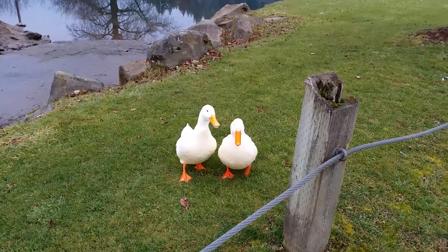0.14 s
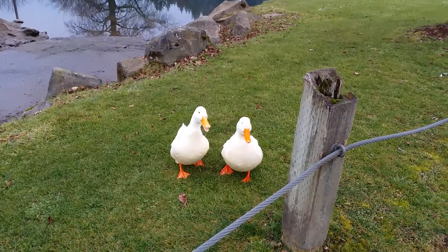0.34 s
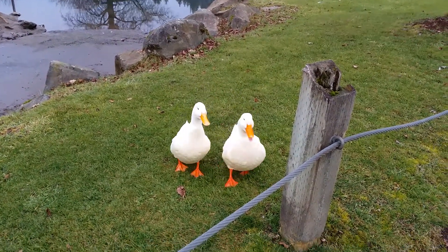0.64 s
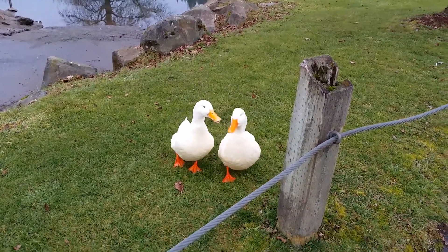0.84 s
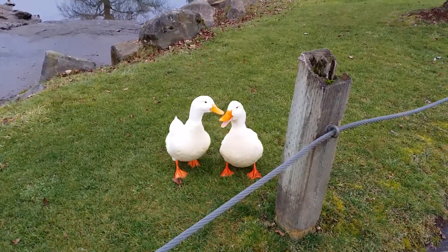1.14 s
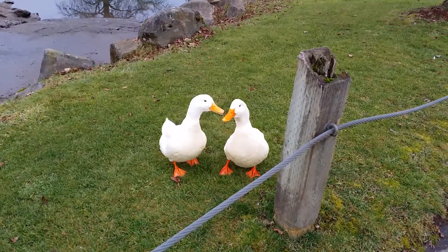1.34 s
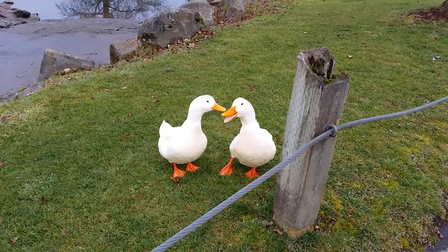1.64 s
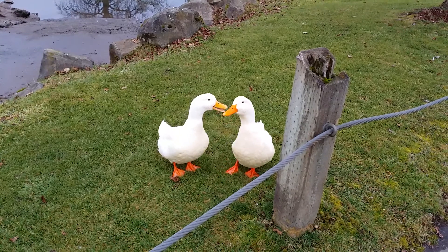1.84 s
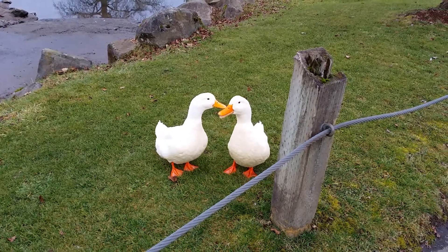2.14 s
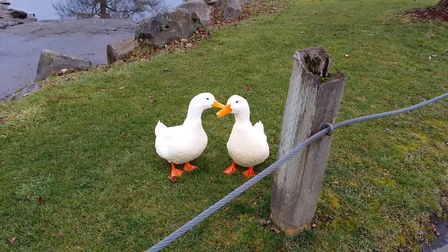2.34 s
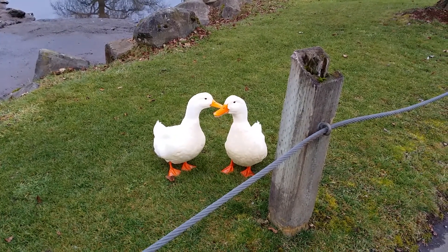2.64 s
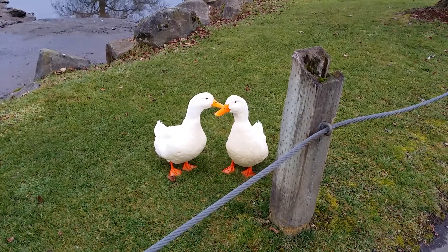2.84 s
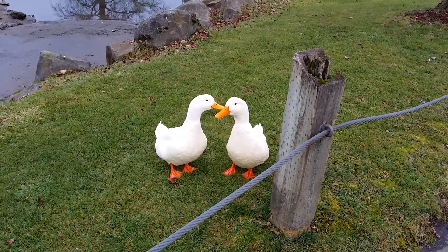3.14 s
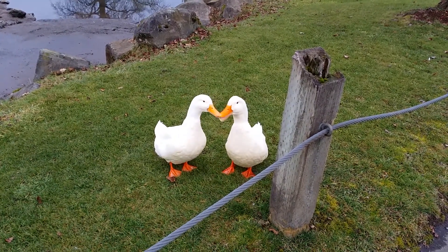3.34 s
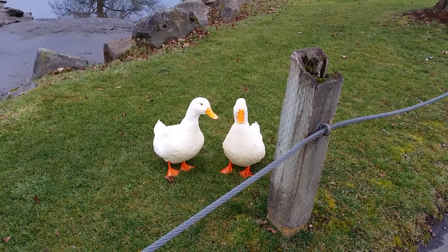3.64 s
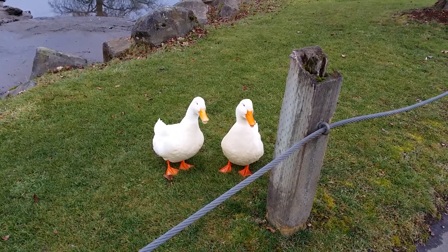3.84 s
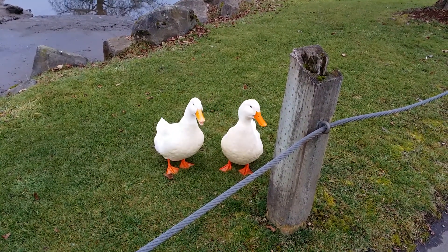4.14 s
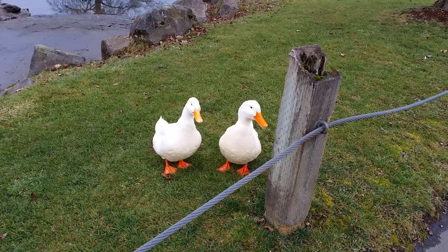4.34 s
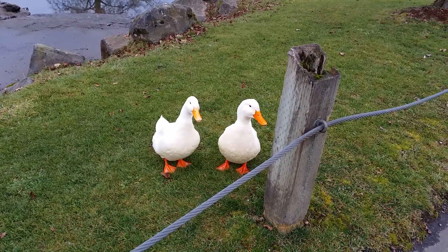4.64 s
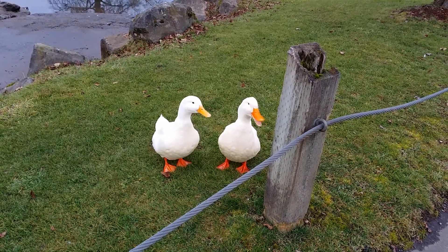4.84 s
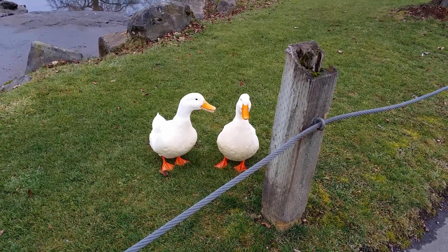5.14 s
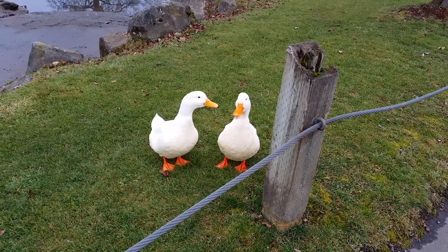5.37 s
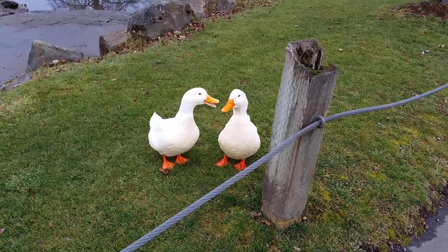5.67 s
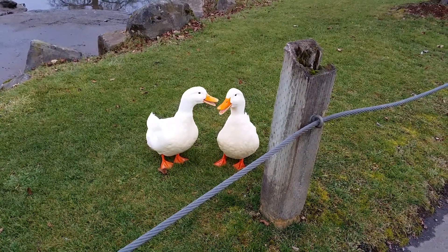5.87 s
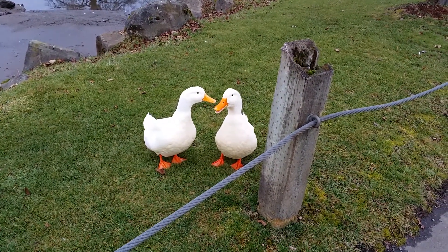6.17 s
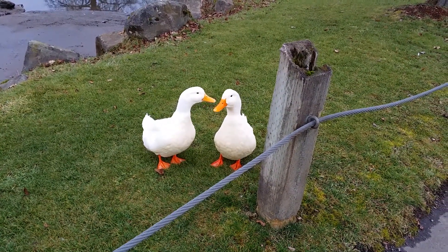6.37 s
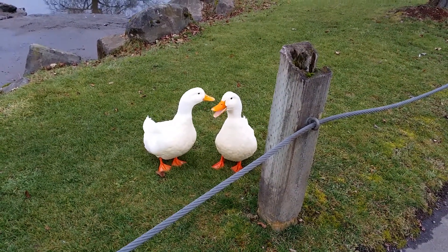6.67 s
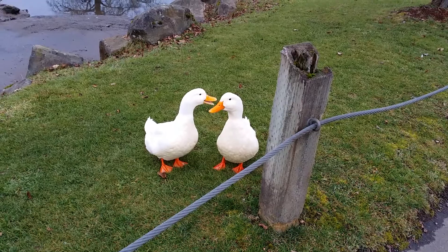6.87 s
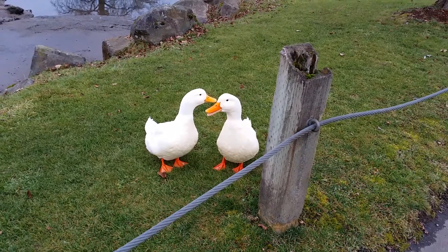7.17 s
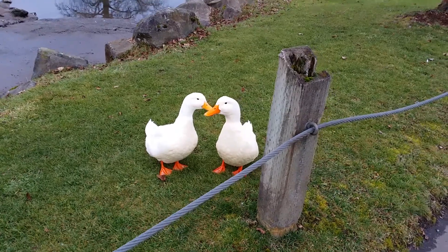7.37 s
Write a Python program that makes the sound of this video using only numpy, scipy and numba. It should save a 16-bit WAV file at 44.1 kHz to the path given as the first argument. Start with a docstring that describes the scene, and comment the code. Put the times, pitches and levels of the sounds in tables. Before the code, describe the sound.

Quick duck conversation outdoors: low-pitched, pulsing quacks, raspier and brighter early on, then alternating between weak mutters and stronger accents, with small clicks of the bills. A thin small bird whistles early, mostly to the right. Distant engines drone quietly under airy background noise. One low thump knocks the left side near two seconds. Hand-held two-microphone phone at close to medium distance, open lawn, little reverberation.

```python
"""On a lakeside lawn, two white ducks chatter a few metres from a hand-held phone with two microphones.
Each quack is a short rattle of syrinx pulses ringing the windpipe, raspy when pushed; bill clicks fall
mostly at the starts of the quacks. Small birds whistle thinly as gliding sine tones; distant engines hum
in a few wavering partials. Open air is noise in flickering bands, and pressure steps bump the left microphone."""
import sys
import numpy as np
from scipy import signal
from scipy.fft import rfft, irfft
from scipy.io import wavfile
from scipy.ndimage import uniform_filter1d
from numba import njit

SR = 44100
rng = np.random.default_rng(int(sys.argv[2]) if len(sys.argv) > 2 else 0)


def store_wav(level_fs):
    """Save 16-bit WAV to argv[1]."""
    pcm = np.round(np.clip(np.atleast_2d(level_fs), -1, 1) * 32767)
    wavfile.write(sys.argv[1], SR, pcm.T.astype(np.int16))


N = 331174
TIME = np.arange(N) / SR

# quacks, before the path to the microphones; rate is at the strongest pulse, resonances are nominal
# [peak_s, attack_s, release_s, level_db, rasp_db, rate_hz, pipe_hz, mouth_hz]
QUACKS = [(0.0712, 0.044, 0.071, -29.5, -14.5, 78, 1917, 1960),
          (0.2395, 0.072, 0.079, -26.5, -14.5, 89, 1866, 2010),
          (0.4144, 0.059, 0.068, -28, -11.5, 87, 1967, 2120), (0.637, 0.1, 0.12, -29, -19, 86, 1810, 1896),
          (0.7517, 0.037, 0.059, -31, -11, 85, 1955, 2030),
          (0.9504, 0.055, 0.071, -25, -13.5, 79.6, 1864, 2007),
          (1.137, 0.068, 0.077, -27, -13.5, 86, 1835, 2020),
          (1.2727, 0.066, 0.043, -33.5, -19, 71, 1940, 1940),
          (1.475, 0.053, 0.065, -26, -17.5, 98, 1882, 1960),
          (1.656, 0.069, 0.085, -28.5, -19, 81.4, 1792, 1934),
          (1.86, 0.038, 0.071, -37.5, -21, 70, 1940, 1825),
          (2.0754, 0.13, 0.081, -31.5, -22, 81, 1764, 1840),
          (2.4144, 0.05, 0.071, -33, -22, 77, 1815, 1730),
          (2.581, 0.053, 0.084, -29, -21, 85, 1795, 1880.0),
          (2.7644, 0.053, 0.049, -40.5, -19.5, 75, 1934, 1680),
          (3.036, 0.13, 0.084, -34.5, -25.5, 76, 1754, 1776),
          (3.3889, 0.097, 0.074, -35, -17.5, 70, 1800, 1740),
          (3.5475, 0.069, 0.077, -27, -16.5, 93, 1880, 1915),
          (3.9614, 0.11, 0.14, -32.5, -18, 81.5, 1755, 1832),
          (4.195, 0.058, 0.047, -31.5, -12, 75, 1917, 1975),
          (4.3587, 0.05, 0.055, -32.5, -19, 77, 1800, 1855),
          (4.52, 0.055, 0.082, -28.5, -17, 91.6, 1816, 1970),
          (4.576, 0.035, 0.045, -36.5, -10.5, 71, 1933, 2010),
          (4.7664, 0.048, 0.058, -31.5, -11, 78, 1916, 1990),
          (4.8836, 0.048, 0.078, -30.5, -20, 76, 1800, 1815),
          (5.0536, 0.072, 0.08, -27, -15.5, 83.8, 1794, 1957),
          (5.1551, 0.043, 0.052, -35, -20.5, 73, 1934, 1910),
          (5.3911, 0.069, 0.096, -30.5, -18, 86, 1783, 1813),
          (5.5715, 0.067, 0.075, -26, -18.5, 86, 1780, 1960),
          (5.73, 0.069, 0.044, -37, -20, 69, 1960, 1820), (5.9725, 0.1, 0.12, -31, -21.5, 90, 1770, 1776),
          (6.1551, 0.06, 0.065, -28, -18, 80, 1798, 1936),
          (6.3125, 0.051, 0.07, -40.5, -18.5, 68, 1940, 1540.0),
          (6.5456, 0.073, 0.12, -32, -21, 81, 1780, 1670),
          (6.7265, 0.065, 0.071, -27.5, -20, 85, 1794, 1887),
          (6.9304, 0.048, 0.077, -42, -19, 71, 1863, 1600),
          (7.1463, 0.1, 0.138, -32.5, -23, 79.5, 1760, 1710),
          (7.306, 0.06, 0.08, -27.5, -21, 88, 1770, 1930)]
# short quacks come to a point, drawn-out ones hold their level [attack_s, rise_flatness (exponent)]
RISE_FLATNESS = [(.06, 2.28), (.11, 3.9)]
FALL_FLATNESS = 1.89
# nominal resonances of the long windpipe [pipe_multiple (ratio), width_hz, level_db]
THROAT = [(0.682, 126, 7.5), (0.788, 151, 4), (0.998, 108, 4), (1.1, 83, -8.5), (1.2, 107, 3.5),
          (1.33, 170, -4.5)]
# nominal resonances of the bill and mouth [pitch_hz, width_hz, level_db]
BILL = [(3170, 380, 0.5), (3440, 57, 6), (3754, 100, 7), (4184, 150, 6), (4550, 110, 3), (4964, 180, 8),
        (5300, 78, 0.5), (5890, 150, -2.5), (6810, 210, 0), (7400, 480, -10)]
USUAL_PIPE_HZ = 1880  # windpipe resonance around which the bill resonances shift
# bill clicks; treble is relative to the body of the click [start_s, peak_db, treble_db]
CLICKS = [(0.0254, -23.5, -32), (.159, -28.5, -19), (.5414, -29, -13), (.714, -24, -22), (0.904, -27.5, -9),
          (1.221, -31.5, -36), (1.4323, -31, -18), (1.822, -32.5, -38), (1.951, -31, -12),
          (2.323, -43, -16), (2.368, -35.5, -8), (2.718, -34.5, -33), (2.916, -39, -10),
          (3.295, -32.5, -21), (3.34, -31.5, -11.5), (3.858, -34, -12), (3.877, -27, -41),
          (4.3123, -29, -26), (4.533, -24.5, -16), (4.838, -31, -29), (5.117, -30.5, -24), (5.345, -28, -7),
          (5.678, -33, -30), (5.882, -32.5, -12), (6.278, -33, -32), (6.485, -33, -10), (6.892, -38.5, -25),
          (7.057, -34.5, -8.5), (7.493, -29, -31)]
CLICK_PAN_DB = -7.5  # left minus right
# colour of the path from the ducks to each microphone, with the dips of the ground bounce
# [pitch_hz, level_db]
LEFT_PATH = [(500, -6), (1000, -0.5), (1200, 6), (1450, 7), (1620, -9.5), (1900, 1.5), (2300, -10.5),
             (2700, -3.5), (3400, 6), (4400, -2), (5000, 4.5), (6500, 8.5), (9000, -13)]
RIGHT_PATH = [(500, -7.5), (1000, -15.5), (1200, 6), (1450, 4.5), (1610, 4), (1740, 7), (2200, 4.5),
              (2700, 5), (3400, 9), (4900, 10.5), (6400, 4.5), (7200, -5), (9000, -11)]
# bird whistles, before each side's gain; turn is the share of the length before the middle pitch
# [start_s, end_s, turn (share), first_hz, middle_hz, last_hz, level_db]
WHISTLES = [(.46, .76, .55, 7200, 7850, 7750, -65), (.57, .72, .5, 8100, 8250, 8050, -65),
            (1.24, 1.58, .5, 7300, 8080, 7400, -66), (3.39, 3.45, .5, 7050, 7080, 7000, -58),
            (6.7, 6.88, .5, 6600, 7500, 8400, -70), (7.435, 7.475, .5, 5300, 6000, 6500, -63)]
# a nearer whistle, before its sag, fade and each side's gain [start_s, first_hz, top_hz, level_db]
LONE_WHISTLE = (.768, 2800, 3380, -52)
# a far engine whose pitch wanders and ends lower [time_s, pitch_hz, level_db]
ENGINE = [(0, 173.9, -51.5), (1.0, 174.6, -47), (2.3, 179, -43.5), (3.7, 169.6, -47.5), (4.4, 166, -42.5),
          (6.15, 167.7, -38.5), (6.4, 157.8, -57.5), (7.5, 149.4, -48.5)]
# deeper drones that come and go [start_s, end_s, pitch_at_start_hz, level_db]
DRONES = [(0, 2.1, 71.2, -40), (5.6, 6, 76.66, -47)]
# higher whines that come and go [start_s, end_s, pitch_at_start_hz, level_db]
WHINES = [(2.25, 2.8, 346, -54.5), (2.75, 3.5, 361, -54.5), (4.3, 4.85, 350, -59)]
DRONE_SAG_HZ_PER_S, WHINE_SAG_HZ_PER_S, HUM_FADE_DB_PER_S = 1.5, 7.3, 43
# spectrum of the outdoor background, relative [pitch_hz, level_db (per Hz)]
AIR = [(18, -43), (30, 2.5), (119, 1.5), (195, -3.5), (524, -15), (735, -12.5), (1200, -20), (1340, -23.5),
       (1690, -23), (2490, -25.5), (3680, -35), (6040, -39.5), (8250, -39), (13900, -52), (15000, -52)]
AIR_DB = -40.5
# background at the two microphones [pitch_hz, likeness (0 to 1), left_minus_right_db]
AIR_STEREO = [(60, 0.98, -3), (298, 0.91, -5), (740, 0.12, -4.5), (1540, 0, -13.5), (5000, 0.0072, -2),
              (12000, 0.0015, 3)]
# level of the low traffic rumble over time [time_s, level_db]
RUMBLE = [(0, -1), (2.8, 1.5), (3.7, -1.5), (4.7, 0.5), (6.1, -1), (7.4, -1.5)]
RUMBLE_TOP_HZ = 250
# knocks on the left microphone [start_s, pressure_step (relative)]
BUMPS = [(1.6, 0.029), (1.9684, 0.28), (1.9704, 1.38)]
TOP_HZ = 14750  # upper limit of the phone


def ducks(level_db=-2.5):
    """All quacks; each microphone hears them with its own colour, the right a tiny lag later."""
    out = np.zeros(N)
    lag = 4  # samples
    for row in QUACKS:
        add(out, *quack(*row))
    return undb(level_db) * np.array([colour(out, LEFT_PATH), colour(np.roll(out, lag), RIGHT_PATH)])


def quack(peak, attack, release, db, rasp_db, rate, pipe_hz, mouth_hz, slowing=.2, fall_db=21,
          rasp_fall_db=31, lead_s=0.000499, overtone=0.44, hiss_db=-17, onset_droop=0.53, gape=0.067):
    """One quack: effort swells and falls, and with it pulse rate, brightness and rasp."""
    jitter, scatter_db, ragged_db = .016, 1.5, .8  # jitter in cycles
    burst_s, sweep_per_s = .0022, 60
    skirt, skirt_s, rasp_s, evenness = .3, .0048, .0027, .8
    sinking, pipe_sinking, pipe_wobble, mouth_wobble = .36, .07, .009, .045

    # weak quacks and very raspy ones are breathier, and the syrinx leaks between the pulses
    weak_breath = np.interp(db, [-38, -29], [.6, .3])
    raspy_breath = np.interp(rasp_db, [-14, -10], [.3, .55])
    breath = max(weak_breath, raspy_breath)
    leak = .5 * breath

    start, end = peak - attack, peak + release
    t = np.arange(max(start - .02, 0), end + .03, 1 / SR)
    rise_flatness = np.interp(attack, *np.transpose(RISE_FLATNESS))
    flat = np.where(t < peak, rise_flatness, FALL_FLATNESS)
    away = effort_gap(t, start, peak, end)
    slack = np.minimum(away, 1) ** 2

    # the syrinx opens once a cycle, slower and less evenly at both ends of the call
    cycles = np.cumsum(rate * (1 - slowing * slack)) / SR
    cycles -= np.interp(peak - lead_s, t, cycles)
    nearest = np.round(cycles)
    count = (nearest - nearest[0]).astype(int)
    # five random draws, each held for one pulse
    chance = rng.standard_normal((count[-1] + 1, 5))[count].T
    timing, strength, length, mouth_chance, pipe_chance = chance
    since = (cycles - nearest + jitter * timing) / rate  # seconds from the opening
    uneven_db = (scatter_db + ragged_db * slack) * strength
    cut_in_db = 40 * np.maximum(away - .8, 0) * (t < peak)  # the call starts abruptly
    swell = undb(-fall_db * away ** flat - cut_in_db + uneven_db)

    # the vowel arches: it rises as the bill opens, holds, and drops late in the tail
    droop = np.minimum(away, 1) ** 2.6 * np.where(t < peak, onset_droop, 1)
    centre = mouth_hz * (1 + gape - sinking * droop) * (1 + mouth_wobble * mouth_chance)
    bend = 1 + pipe_sinking * (.2 - np.sqrt(droop)) + pipe_wobble * pipe_chance

    # each opening is a sharp snap on a wider skirt, while the membrane sweeps up
    # through the windpipe resonances
    phase = 2 * np.pi * centre * (since + sweep_per_s * since ** 2 / 2)
    snap = np.exp(-(since / (burst_s * np.exp(.3 * length))) ** 2)
    opening = (1 - skirt) * snap + skirt * np.exp(-(since / skirt_s) ** 2)
    rush_noise, puff_noise = rng.standard_normal((2, len(t)))
    rush = unit(ring(ring(rush_noise, centre, 1500), centre, 1500))
    source = opening * np.sin(phase) + breath * (opening + leak) * rush
    voice = windpipe(source, pipe_hz * bend)

    # mostly the effort sets the strength of each pulse, whichever resonance it meets
    pulse_power = np.bincount(count, voice ** 2) / np.bincount(count)
    pulse_rms = np.sqrt(pulse_power + np.mean(voice ** 2) / 20)[count]
    evened = unit(voice / uniform_filter1d(pulse_rms, size=96) ** evenness)
    voice = evened * uniform_filter1d(swell, size=96)

    # a puff of turbulent air and the overtone of the sweep ring the bill, most at the height of effort
    rasp_swell = undb(-rasp_fall_db * away ** flat + uneven_db)
    puff = np.exp(-((since - .001) / rasp_s) ** 2) + 1.4 * leak
    stretch = (pipe_hz / USUAL_PIPE_HZ) ** .7 * (1 - .03 * droop)
    rasp_source = puff * puff_noise + overtone * opening * np.sin(2 * phase)
    rasp = bill(rasp_source * rasp_swell, stretch)

    # a raspier quack has more treble above 5600 Hz, mostly while the effort is near its height
    rasp = cut(rasp, 2330, "high", order=3)
    pushed = np.interp(rasp_db, [-21, -12], [.45, 1.1]) * np.exp(-(away / .6) ** 2) + .15
    rasp_top = cut(cut(rasp, 5600, "high", order=9), 8200, "low", order=4)
    rasp = cut(rasp, 5600, "low", order=9) + pushed * rasp_top
    rasp = undb(rasp_db) * unit(rasp) * np.sqrt(np.mean(rasp_swell ** 2))

    # a little air escapes past the bill as a thin high hiss
    escaping = cut(puff * rush_noise * swell, 8800, "high")
    hiss = undb(hiss_db) * cut(escaping, 10700, "low", order=8)
    return t[0], undb(db) * (hiss + voice + rasp)


def effort_gap(t, start, peak, end):
    """Distance from the height of a call: 0 at its strongest pulse, 1 at its start and end."""
    return np.abs(np.interp(t, [2 * start - peak, peak, 2 * end - peak], [-2, 0, 2]))


def windpipe(source, pipe_hz):
    """Ring the windpipe; the neck is held a little differently for every quack."""
    vary_db, pure_db, pure_narrowing = 1.5, 5, .45
    # the duck with the higher voice has a purer, longer ring at its main resonance
    purity = np.interp(pipe_hz.max(), [1880, 1950], [0, 1])
    own_db = vary_db * rng.standard_normal(len(THROAT))
    voice = 0
    for (ratio, width, db), own in zip(THROAT, own_db):
        pure = purity * (abs(ratio - 1) < .06)
        ringing = ring(source, ratio * pipe_hz, width * (1 - pure_narrowing * pure))
        voice = voice + undb(db + own + pure_db * pure) * ringing
    return cut(cut(voice, 2810, "low", order=6), 860, "high", order=4)


def bill(x, stretch):
    """Ring the resonances of the bill, never held quite alike; stretch shifts them all."""
    own_db = 2.0 * rng.standard_normal(len(BILL))
    return sum(undb(db + own) * ring(x, hz * stretch, width)
               for (hz, width, db), own in zip(BILL, own_db))


def bill_clicks(decay_s=0.0034, level_db=-2, snap_db=2, knock_db=-5):
    """The wet bill parts with a short crackle over a small hollow knock."""
    out, t = np.zeros((2, N)), np.arange(SR // 30) / SR
    pan_db = np.array([[CLICK_PAN_DB], [-CLICK_PAN_DB]]) / 2
    for s, db, top_db in CLICKS:
        crackle = rng.standard_normal(len(t)) * np.exp(-t / decay_s)
        rung = bill(crackle, 0.96) + 0.15 * ring(crackle, 8600, 620)
        body = cut(cut(rung, 2200, "high"), 2220, "low")
        body = body + undb(knock_db) * ring(crackle, 570, 760)
        top = cut(cut(crackle, 6000, "high"), 10500, "low", order=6)
        click = body / np.abs(body).max() + undb(top_db + snap_db) * top / np.abs(top).max()
        click = cut(click, 10300, "low", order=8)
        add(out, s, undb(db + level_db + pan_db) * click)
    return out


def lone_whistle(rise_s=0.015, sag_hz_per_s=900, fade_db_per_s=70):
    """A nearer bird slides up to its note, then sags and fades; stronger on the right."""
    start, low_hz, top_hz, db = LONE_WHISTLE
    t = np.arange(SR // 4) / SR
    slide = np.exp(-(t / (2 * rise_s)) ** 2)
    hz = top_hz - (top_hz - low_hz) * slide - sag_hz_per_s * t
    ending = np.minimum(10 * (1 - t / t[-1]), 1)
    swell = (1 - slide) * undb(db - fade_db_per_s * t) * ending
    out = np.zeros(N)
    add(out, start, swell * np.sin(2 * np.pi * np.cumsum(hz) / SR))
    return np.array([0.79 * out, 4.1 * out])


def birds(level_db=-1):
    """Thin gliding whistles from the trees, quavering in pitch and level; stronger on the right."""
    out = np.zeros(N)
    for start, end, turn, first_hz, middle_hz, last_hz, db in WHISTLES:
        u = np.linspace(0, 1, int((end - start) * SR))
        quaver = (middle_hz / 6000) ** 2
        glide = np.polyfit([0, .5, 1], [first_hz, middle_hz, last_hz], 2)
        hz = np.polyval(glide, u ** (-1 / np.log2(turn)))  # the middle pitch falls at u = turn
        hz = hz * (1 + .015 * quaver * walk(1200)[:len(u)])
        whistle_db = db + level_db + 2 * quaver * walk(105)[:len(u)]
        swell = np.sqrt(np.abs(np.sin(np.pi * u))) * undb(whistle_db)
        add(out, start, swell * np.sin(2 * np.pi * np.cumsum(hz) / SR))
    return np.array([1.0 * out, 2.9 * out])


def surroundings(x, near_db=-15, far_db=-23, far_s=0.0063):
    """Quick scatter from lawn and post, then a faint return from rocks and trees."""
    near_s = .005
    t = np.arange(SR // 2) / SR
    near_noise, far_noise = rng.standard_normal((2, 2, len(t)))
    near = near_noise * np.exp(-t / near_s) * (t > .001)
    far = cut(far_noise, 3800, "low") * np.exp(-t / far_s) * (t > .02)
    response = (undb(near_db) * unit(near) + undb(far_db) * unit(far)) / np.sqrt(len(t))
    return x + signal.fftconvolve(x, response, axes=1)[:, :N]


def bump(leak_s=0.0017, crack_db=-17):
    """A touch on the left port: steps of pressure that leak away, with a thin crack."""
    push = sum(size * (TIME >= s) * np.exp(-np.abs(TIME - s) / leak_s) for s, size in BUMPS)
    crack = undb(crack_db) * cut(push, 8100, "high")
    return np.array([cut(push, 2700, "low", order=2) + crack, np.zeros(N)])


def far_engines():
    """One lasting hum, with drones and whines that come and go."""
    s, hz, db = np.transpose(ENGINE)
    engine = hum(np.interp(TIME, s, hz), np.interp(TIME, s, db), [(1, -2.0), (2, -14.0)])
    drones = passing(DRONES, DRONE_SAG_HZ_PER_S, [(1, -1.5), (1.66, -4.5)], waver=0.0229)
    whines = passing(WHINES, WHINE_SAG_HZ_PER_S, [(1, -1), (1.19, -3.5)], waver=0.0015)
    return engine + drones + whines


def passing(table, sag_hz_per_s, partials, waver):
    """Hums that swell, hold and fade, their pitch sinking."""
    out = 0
    for start, end, hz, db in table:
        outside = np.abs(TIME - np.clip(TIME, start, end))
        sinking_hz = hz - sag_hz_per_s * (TIME - start)
        out = out + hum(sinking_hz, db - HUM_FADE_DB_PER_S * outside, partials, waver)
    return out


def hum(hz, db, partials, waver=0.00249, flutter_db=0.0):
    """A distant engine: a few partials (multiple, dB) that waver on their way through the air."""
    phase = 2 * np.pi * np.cumsum(hz * (1 + waver * walk(9))) / SR
    tone = sum(undb(gain_db + flutter_db * walk(16.0)) * np.sin(k * phase) for k, gain_db in partials)
    return np.sqrt(2) * tone * undb(db) * undb([[-2.2], [1.6]])  # left, right


def air(level_db=0, flicker_db=2.0):
    """Far traffic and open air: third-octave bands that flicker; the bass is alike on both sides."""
    hz, out = np.fft.rfftfreq(N, 1 / SR), 0
    shared, own_left, own_right = rfft(rng.standard_normal((3, N)))
    alike = np.clip(on_log(hz, AIR_STEREO), 0, 1)
    pan_db = on_log(hz, AIR_STEREO, axis=2)
    own = np.array([own_left, own_right])
    field = unit(undb(on_log(hz, AIR))) * (np.sqrt(alike) * shared + np.sqrt(1 - alike) * own)
    field *= undb(np.array([pan_db, -pan_db]) / 2)
    field *= np.sqrt(2 / (1 + alike))
    band = np.round(3 * np.log2(np.maximum(hz, 50)))
    for k in np.unique(band):
        low_hz = hz[band == k][0]
        rumble_db = np.interp(TIME, *np.transpose(RUMBLE)) * (low_hz < RUMBLE_TOP_HZ)
        unsteady = np.interp(low_hz, [800, 2500], [1, .5])  # the far hiss is smoother
        out = out + irfft(field * (band == k), N) * undb(rumble_db + unsteady * flicker_db * walk(8))
    return out * undb(AIR_DB + level_db)


def undb(db):
    """Decibels to gain."""
    return 10 ** (np.asarray(db) / 20)


def unit(x):
    """Scale to rms 1."""
    return x / np.sqrt(np.mean(x ** 2) + 1e-20)


def on_log(hz, table, axis=1):
    """Read a column of a table along log frequency."""
    table = np.array(table, float)
    return np.interp(np.log(np.maximum(hz, 1)), np.log(table[:, 0]), table[:, axis])


def walk(rate):
    """Random levels held 1 / rate s and smoothed twice; spread near 1."""
    k = int(SR / rate)
    held = np.repeat(rng.standard_normal(N // k + 1), k)
    return unit(uniform_filter1d(uniform_filter1d(held, k), k)[:N])


@njit
def svf(x, hz, width):
    """State-variable band-pass with a moving centre, gain 1 there."""
    y, b, l = np.empty(len(x)), 0., 0.  # b and l are the band and low-pass states
    for i in range(len(x)):
        g, k = np.tan(np.pi * hz[i] / SR), width / hz[i]
        v = (b + g * (x[i] - l)) / (1 + g * (g + k))
        b, l, y[i] = 2 * v - b, l + 2 * g * v, k * v
    return y


def ring(x, hz, width):
    """One resonance, fixed or moving."""
    return svf(x + 1e-18, np.minimum(hz, SR / 2.3) * np.ones(len(x)), float(width))


def cut(x, hz, kind, order=2):
    """Butterworth low-pass or high-pass."""
    return signal.sosfilt(signal.butter(order, min(hz, SR / 2 - 1), kind, fs=SR, output="sos"), x)


def colour(x, table, size=2048):
    """Causal filter with the given (Hz, dB) response, its minimum phase found by folding the cepstrum."""
    cepstrum = irfft(np.log(undb(on_log(np.fft.rfftfreq(size, 1 / SR), table))))
    cepstrum[1:size // 2] *= 2
    cepstrum[size // 2 + 1:] = 0
    return signal.fftconvolve(x, irfft(np.exp(rfft(cepstrum))))[:len(x)]


def add(out, s, x):
    """Mix a short sound in at time s."""
    i = max(int(s * SR), 0)
    out[..., i:i + x.shape[-1]] += x[..., :max(N - i, 0)]


def scene():
    """Ducks and birds in the open, over the distant hums and air, with the bumps at the microphone."""
    animals = ducks() + bill_clicks() + birds() + lone_whistle()
    return surroundings(animals) + far_engines() + air() + bump()


def record(dry):
    """The phone cuts the deep bass steeply, which makes a bump ring, and cuts the top."""
    thin = cut(dry, 56.3, "high", order=8)
    return signal.sosfilt(signal.ellip(8, .2, 70, TOP_HZ, fs=SR, output="sos"), thin)


dry = scene()
out = record(dry)
store_wav(out)
```